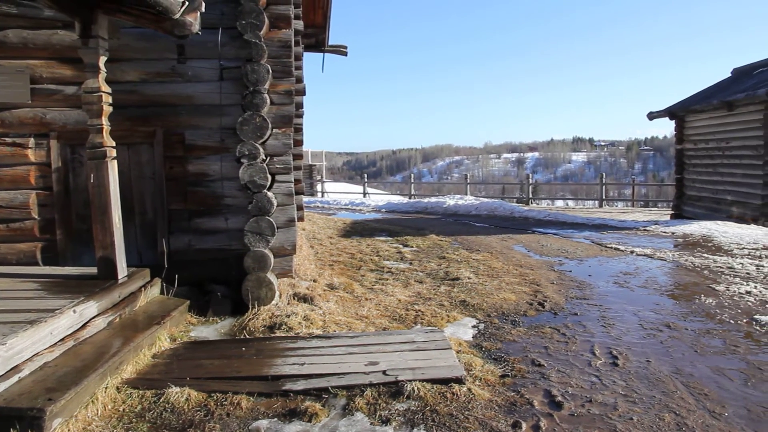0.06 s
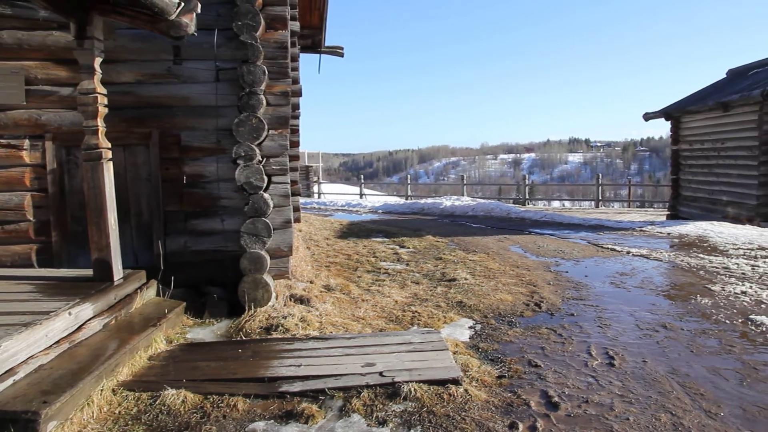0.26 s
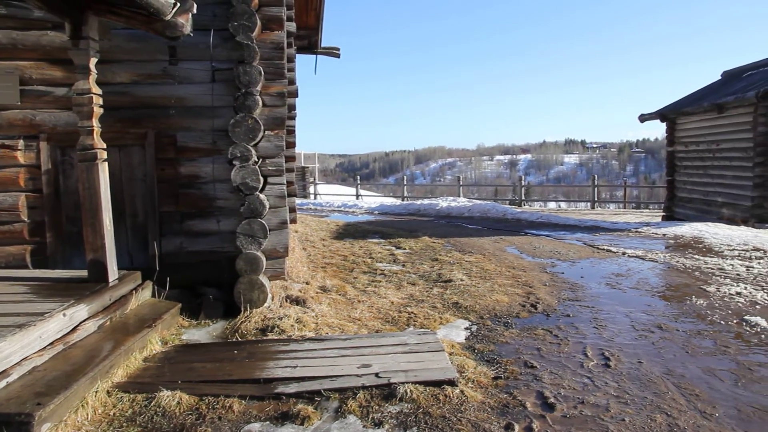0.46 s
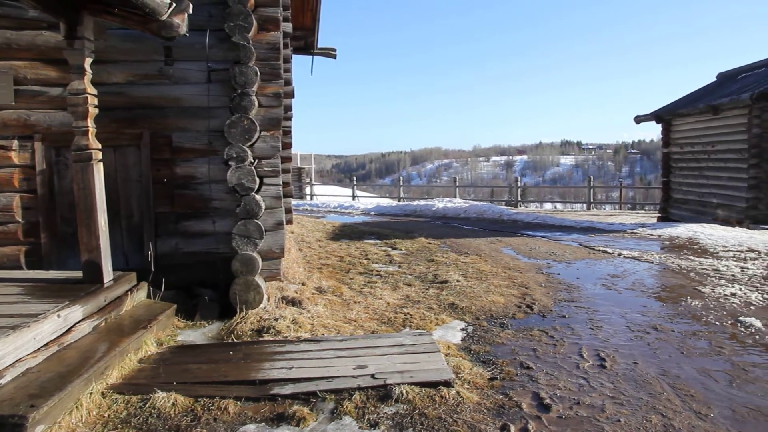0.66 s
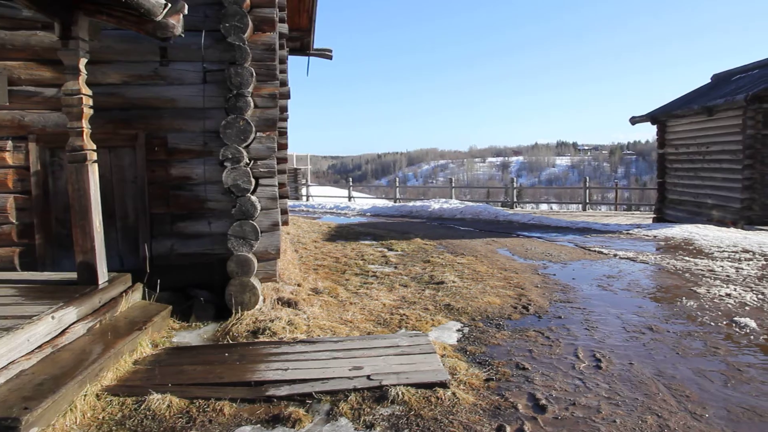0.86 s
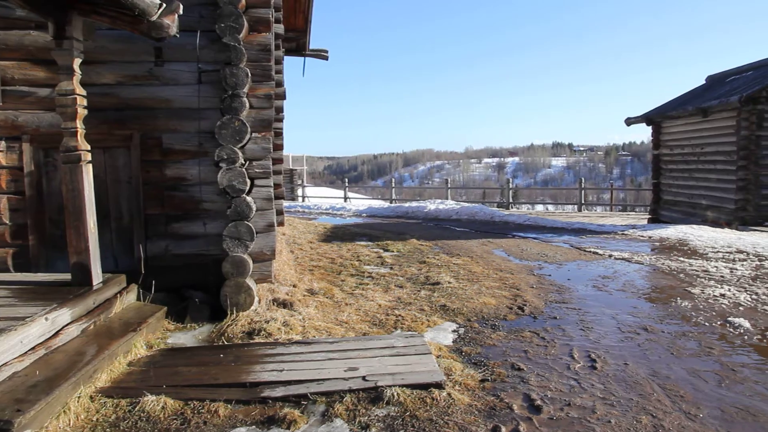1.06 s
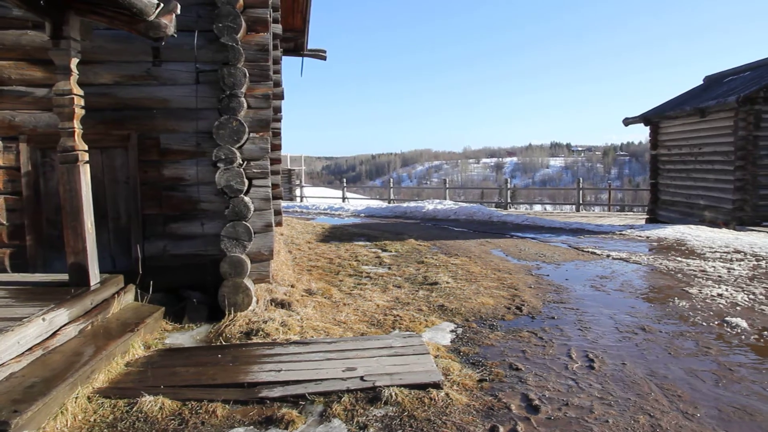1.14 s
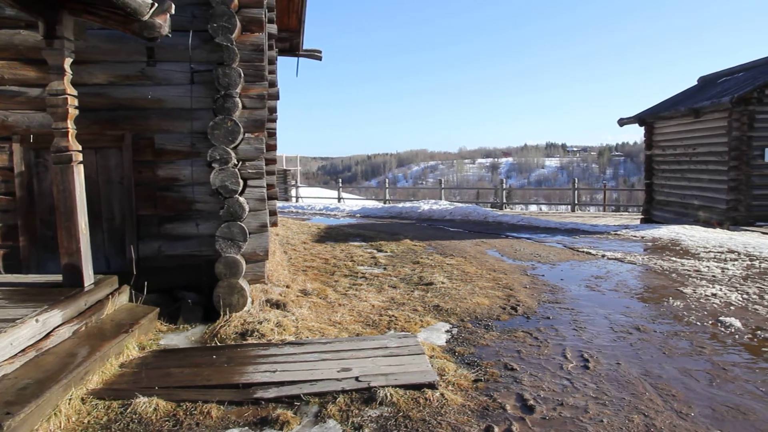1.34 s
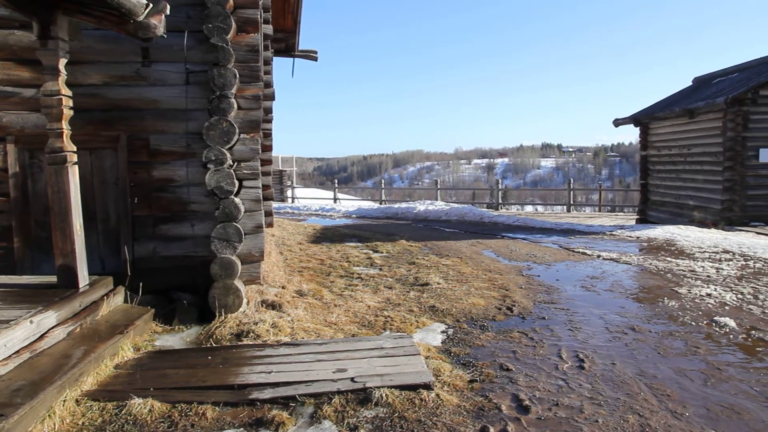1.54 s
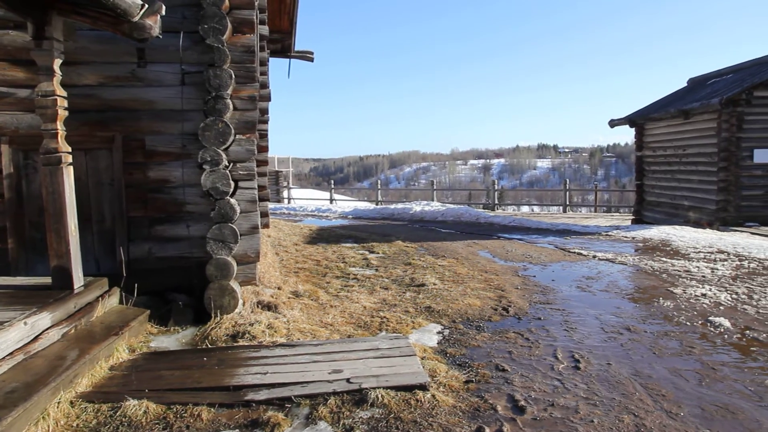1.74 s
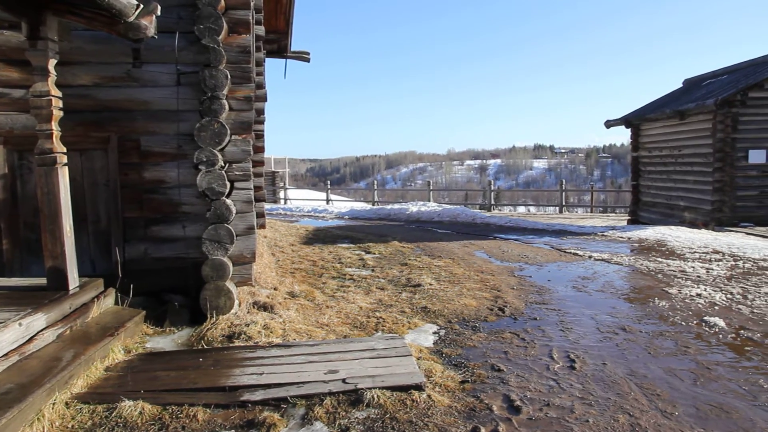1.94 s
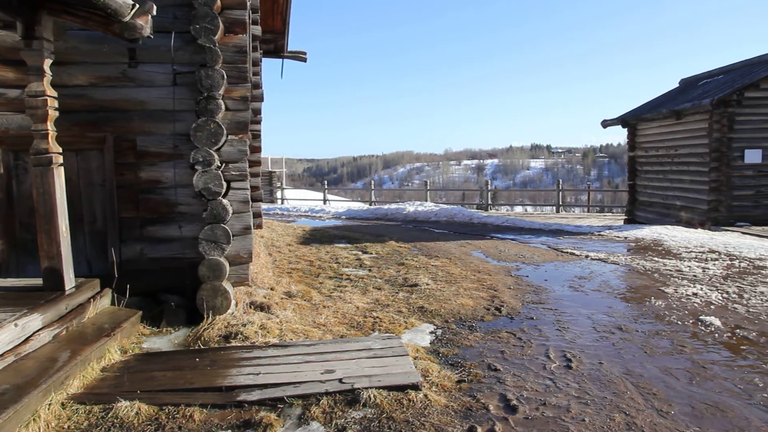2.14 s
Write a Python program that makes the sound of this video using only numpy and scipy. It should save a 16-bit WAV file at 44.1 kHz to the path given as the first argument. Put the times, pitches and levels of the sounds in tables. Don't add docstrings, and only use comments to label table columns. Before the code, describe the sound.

Dripping thaw water taps boards and wet ground in an open yard while a low gust thumps early on

```python
import sys
import numpy as np
from scipy import signal
from scipy.fft import rfft, irfft, next_fast_len
from scipy.io import wavfile
from scipy.ndimage import uniform_filter1d, map_coordinates

SR = 44100
rng = np.random.default_rng(int(sys.argv[2]) if len(sys.argv) > 2 else 0)


def store_wav(level_fs):
    pcm = np.round(np.clip(np.atleast_2d(level_fs), -1, 1) * 32767)
    wavfile.write(sys.argv[1], SR, pcm.T.astype(np.int16))


def rack_gain(trim_db):
    fader = np.asarray(trim_db, float)
    return 10 ** (fader / 20)


N = 97020


def unit(x):
    return x / np.sqrt(np.mean(x ** 2) + 1e-20)


def along(points, hz):
    point_hz, value = np.transpose(points)
    return np.interp(np.log(hz + 1), np.log(point_hz + 1), value)


def wobble(rate, count=N):
    knots = rng.standard_normal(int(count / SR * 3000) + 8)
    return map_coordinates(knots, [np.arange(count) * rate / SR])


def filtered(x, response):
    m = next_fast_len(x.shape[-1] + SR // 4)
    spectrum = rfft(x, m) * response(np.fft.rfftfreq(m, 1 / SR))
    return irfft(spectrum, m)[..., :x.shape[-1]]


def rush(spectrum, patchy_db):
    z = signal.stft(rng.standard_normal(N + SR), nperseg=512)[2]
    patches = uniform_filter1d(rng.standard_normal(z.shape), size=12, axis=0)
    patches = uniform_filter1d(patches, size=3, axis=1)
    x = signal.istft(z * rack_gain(patchy_db * unit(patches)), nperseg=512)[1][:N]
    return unit(filtered(x, lambda hz: rack_gain(along(spectrum, hz))))


# frequency in Hz, density in dB per Hz.
YARD_TONE = [(88, -6.5), (150, -2), (594, -15.5), (991, -16), (2220, -26.5), (3490, -29), (8450, -33.5),
             (15200, -42), (16500, -61)]


def yard():
    return rack_gain(-54.5 + 0.32 * wobble(7.34)) * rush(YARD_TONE, patchy_db=2.0)


# time in seconds, strength in dB.
GUST = [(0.0, -42.5), (.2, -40), (.36, -40.5), (.44, -41), (0.56, -34), (.75, -40), (.87, -39.5),
        (1.03, -46), (1.12, -47), (1.55, -47.5), (1.7, -48), (2.11, -50.5), (2.2, -36)]
# frequency in Hz, density in dB per Hz.
BUFFET_TONE = [(12, -13), (20, 9.5), (92, 4.5), (281, -15.5), (468, -47.5), (576, -25), (654, -32),
               (900, -34), (1170, -79), (1980, -120)]
# frequency in Hz, density in dB per Hz.
FLUTTER_TONE = [(120, -14), (260, 3), (420, -0.5), (800, -24), (1300, -83)]


def gust():
    strength_db = np.interp(np.arange(N) / SR, *np.transpose(GUST))
    buffet = rush(BUFFET_TONE, patchy_db=0.0) * rack_gain(strength_db + 0.5)
    flutter_db = -51 + 1.44 * (strength_db + 34.5) + 1.4 * wobble(50.3)
    return buffet + rush(FLUTTER_TONE, patchy_db=-1.5) * rack_gain(flutter_db)


# time in seconds, peak in dB, passing time in seconds
EDDY_PASSES = [(.012, -33, .0022), (0.123, -33.5, -.003), (.218, -33, -.0022), (0.249, -29.5, .0016),
               (0.2531, -46, -.002), (0.2862, -39, -.0025), (0.293, -29.5, .0018), (.331, -32, -.004),
               (0.336, -34, .004), (0.4127, -34, .0025), (0.4159, -27.5, -.0022), (0.4206, -25, .0017),
               (0.4844, -31, .001), (0.4903, -30, -.0025), (0.497, -27, -.0025), (0.5115, -33.5, .003),
               (0.521, -27.5, .0024), (0.53, -28.5, .001), (0.5313, -32.5, -.0008), (.5334, -34.5, .0006),
               (0.536, -12.5, .00105), (0.5401, -23, -.003), (.547, -27, .003), (0.5586, -28.5, -.0024),
               (.5632, -27, .002), (.5755, -29, .003), (0.6004, -39.5, .0005), (0.6027, -31, .0008),
               (0.6054, -31, -.0013), (.618, -35, -.003), (0.6294, -25.5, -.0017), (.638, -29, -.0018),
               (0.663, -26.5, -.0016), (.6648, -30.5, .0017), (.685, -37, -.003), (0.6944, -33.5, .002),
               (.7185, -27.5, -.002), (0.749, -29, .0022), (0.7619, -37, -.002), (.783, -31.5, -.0024),
               (0.8, -40, .002), (0.836, -31.5, .0032), (0.8727, -30.5, -.0024), (.877, -39, .0024),
               (1.012, -38.5, -.0026), (1.573, -33.5, .0047), (2.184, -35.5, .0034)]


def eddies():
    tail_power, pull = 6.9, -0.22
    t = np.arange(N) / SR
    out = np.zeros(N)
    for s, db, pass_s in EDDY_PASSES:
        u = (t - s) / pass_s
        swirl = 2.19 * (u - pull) / (1 + u * u / tail_power) ** tail_power
        v = (t - s) / 0.0002
        core = 0.2 * v * np.exp(-v * v / 2)
        steepness = min(1, (0.0012 / abs(pass_s)) ** 5)
        out += rack_gain(db) * (swirl + np.sign(pass_s) * steepness * core)
    return out


# frequency in Hz, t60 in seconds.
WALL_DECAY = [(500, 0.7), (4000, 0.17), (14000, 0.061)]


def wall(x):
    hz, t, z = signal.stft(rng.standard_normal(SR // 4), SR, nperseg=128)
    decay = rack_gain(-60 * t / along(WALL_DECAY, hz)[:, None])
    tail = signal.istft(z * decay, SR, nperseg=128)[1]
    return signal.fftconvolve(x, tail / np.linalg.norm(tail))[:N]


def patter():
    s, pitch, size, life = rng.random((int(N / SR * 400), 4)).T
    falls = np.arange(len(s)) < 140 * N / SR
    hz = np.clip(5500 * np.exp(1.5 * (pitch - .5)), 900, 15000)[:, None]
    t = np.arange(128) / SR
    grain = np.sin(2 * np.pi * hz * t) * np.exp(-t * hz / (2.8 + 3.8 * life[:, None]))
    level = falls * rack_gain(-74 - 5.5 * np.log(size + 0.019))
    grain = grain * level[:, None]
    at = (s * N).astype(int)[:, None] + np.arange(128)
    return np.bincount(at.ravel(), grain.ravel(), N + 128)[:N]


# frequency in Hz, density in dB per Hz.
DROP_TONE = [(600, -27), (1200, -1.5), (1800, -2), (5840, -4.5), (10700, -5.5), (13200, -8), (14600, -10),
             (16500, -23)]


def bursts(rows, rise_s, q, ring_db, crackle_db, ping_db=-99):
    out = np.zeros(N + SR)
    t = np.arange(SR // 8) / SR
    for s, db, centre_hz, t60, *brightness in rows:
        tilt_db = sum(brightness)

        def colour(hz):
            detune = hz / centre_hz - centre_hz / (hz + 1)
            ring = rack_gain(ring_db + 190 * t60) / (1 + (q * detune) ** 2)
            tilt = rack_gain(tilt_db * np.log2((hz + 1) / centre_hz))
            return rack_gain(along(DROP_TONE, hz)) * (tilt + ring)

        rise = 1 - np.exp(-t / (rise_s + 1.2 * t60 ** 2))
        shape = rack_gain(-60 * t / max(t60, .002)) * rise
        puff = shape * filtered(rng.standard_normal(len(t)), colour)
        puff = puff * rack_gain(crackle_db * wobble(430, count=len(t)))
        puff = puff * np.linalg.norm(shape) / np.linalg.norm(puff) / shape.max()
        u = t * centre_hz / 0.79
        ping = rack_gain(ping_db - 2 * tilt_db) * np.sin(2 * np.pi * centre_hz * t) * u * np.exp(1 - u)
        out[round(s * SR):][:len(t)] += rack_gain(db - 8.5) * (puff + ping)
    return out[:N]


# start in seconds, peak in dB, centre in Hz, t60 in seconds.
MUD_DROPS = [(.0074, -41, 7400, 0.056), (.085, -46, 5320, 0.063), (.132, -40.5, 6200, 0.039),
             (.142, -43.5, 4570, .1), (.274, -48, 5600, 0.21), (.2955, -45, 5300, 0.051),
             (.345, -52, 7300, 0.029), (.395, -47, 9000, 0.033), (.444, -47, 5960, 0.1),
             (.505, -53, 9050, 0.045), (.566, -40, 5100, 0.044), (.58, -49, 8040, 0.1),
             (.69, -49.5, 6060, 0.032), (.742, -49.5, 8100, 0.078), (.821, -42, 7340, 0.11),
             (.853, -39, 6000, 0.056), (.874, -48, 7000, 0.059), (.976, -44.5, 5300, 0.047),
             (1.11, -54.5, 7950, 0.099), (1.226, -44, 11500, 0.026), (1.264, -44, 10000, 0.031),
             (1.297, -39.5, 8700, 0.039), (1.415, -46, 5960, 0.069), (1.448, -44.5, 7400, 0.081),
             (1.577, -44, 6960, 0.047), (1.643, -44, 4200, 0.047), (1.685, -46, 6500, 0.09),
             (1.818, -45.5, 7360, 0.057), (1.93, -50, 7400, 0.1), (2.165, -39.5, 5430, .05)]


def splats():
    return rack_gain(-5) * bursts(MUD_DROPS, rise_s=0.00081, q=1.2, ring_db=-7, crackle_db=2.5)


# start in seconds, peak in dB, ring in Hz, t60 in seconds,
# brightness in dB per octave.
BOARD_DROPS = [(.0686, -33.5, 5400, 0.0093, 0.5), (.0814, -34.5, 5040, 0.012, 0),
               (.1393, -44.5, 4970, 0.012, -3), (.2096, -35.5, 6840, 0.0022, -2.5),
               (.3027, -34, 3940, 0.0048, 2.5), (.4574, -37, 2500, 0.0066, 4.5),
               (.656, -43, 4740, 0.0069, -1), (.8186, -34.5, 2580, 0.0071, 1.5),
               (.853, -41, 13000, 0.0091, -1), (.8578, -40.5, 5360, 0.0098, 0.5),
               (1.1614, -41, 4900, 0.0065, -1.5), (1.188, -32, 8750, 0.0046, -3),
               (1.2981, -38, 6500, 0.011, 3), (1.5475, -34.5, 8600, 0.0068, 0.5),
               (1.551, -46.5, 4140, 0.0087, -1), (1.6166, -47, 2520, 0.0055, -1.5),
               (1.7668, -30, 4050, 0.0042, 5.5), (1.7726, -42, 7600, 0.014, 12),
               (1.9207, -29, 2630, 0.0032, -2.5), (1.9777, -45, 1580, 0.018, -2.5),
               (2.0424, -28, 6300, 0.0039, -0.5), (2.0505, -37.5, 7040, 0.015, 2),
               (2.14, -47.5, 2980, 0.012, 1)]
# start in seconds, peak in dB, ring in Hz, t60 in seconds.
SMALL_DROPS = [(0.01, -37.5, 6960, 0.0047), (.176, -60, 6500, .005), (0.295, -49, 3520, 0.0043),
               (0.366, -44, 7440, 0.0035), (0.417, -45, 4000, 0.0045), (0.52, -52, 11000, .007),
               (0.924, -49, 9000, 0.013), (0.941, -44, 5950, 0.0091), (.968, -54, 11000, 0.0061),
               (1.065, -47.5, 8000, 0.018), (1.201, -48, 7900, 0.0046), (1.246, -43, 6950, 0.0076),
               (1.274, -46, 7000, .005), (1.304, -48, 12500, 0.0041), (1.309, -54, 12500, 0.0055),
               (1.329, -68, 13000, .005), (1.435, -47, 5000, 0.0063), (1.445, -44, 8500, 0.0071),
               (1.677, -43, 5150, 0.0092), (1.685, -42.5, 6750, 0.009), (1.81, -47, 7500, 0.011),
               (1.931, -43, 8360, 0.0056), (1.988, -59, 10500, 0.0065), (2.131, -51, 8000, 0.004),
               (0.8186, -39.5, 1550, .005), (0.8227, -50, 9000, .004), (.826, -54, 8600, .004),
               (1.1895, -41.5, 2600, 0.0033), (1.548, -44, 1700, 0.0071), (1.916, -47, 10000, .004),
               (1.9263, -50, 2200, 0.0067), (1.9781, -43.5, 910, 0.01), (.2975, -35.5, 5940, 0.012),
               (1.5479, -40, 4160, 0.0041), (1.657, -52, 6000, .008), (2.0426, -37, 4430, 0.0069),
               (1.774, -44.5, 2900, 0.0074), (1.987, -53, 1100, .006), (1.9212, -37.5, 1940, 0.0057)]


def taps():
    rows = BOARD_DROPS + SMALL_DROPS
    return rack_gain(-1.5) * bursts(rows, rise_s=0.00031, q=2.2, ring_db=1.5, crackle_db=-10.0, ping_db=6)


def scene():
    drops = taps() + patter() + splats()
    echo = rack_gain(-14) * wall(drops)
    return (drops + echo + gust() + eddies() + yard())[None]


def low_pass(x):
    return signal.sosfilt(signal.butter(12, 16640, fs=SR, output="sos"), x)


def record(dry):
    mix = filtered(dry, lambda hz: hz ** 2 / (40.3 ** 2 + hz ** 2) * (hz < 16500))
    return low_pass(mix)


dry = scene()
out = record(dry)
store_wav(out)
```